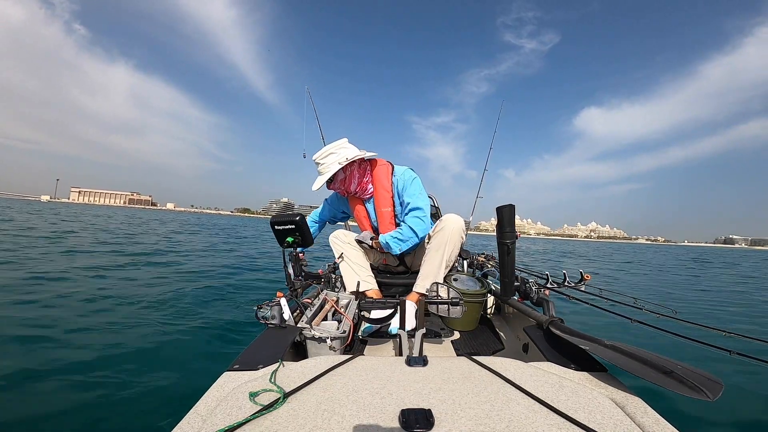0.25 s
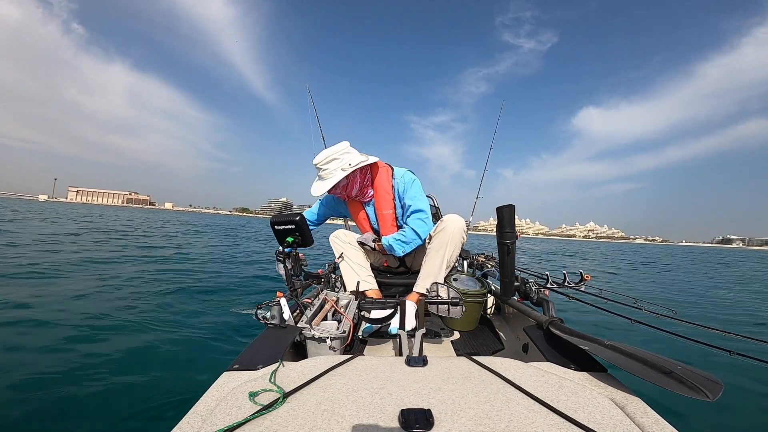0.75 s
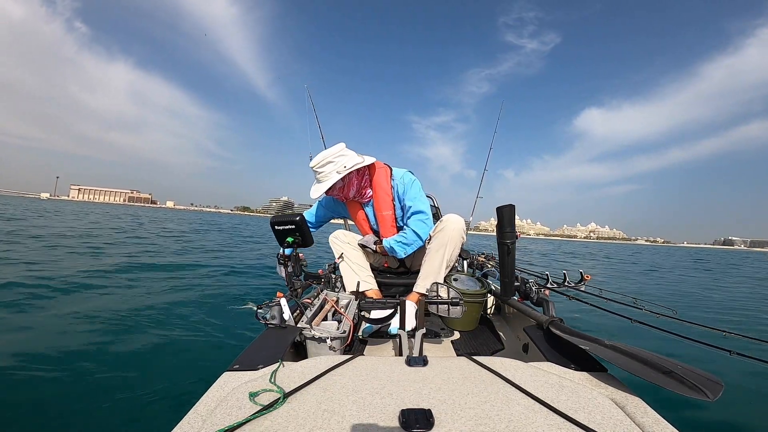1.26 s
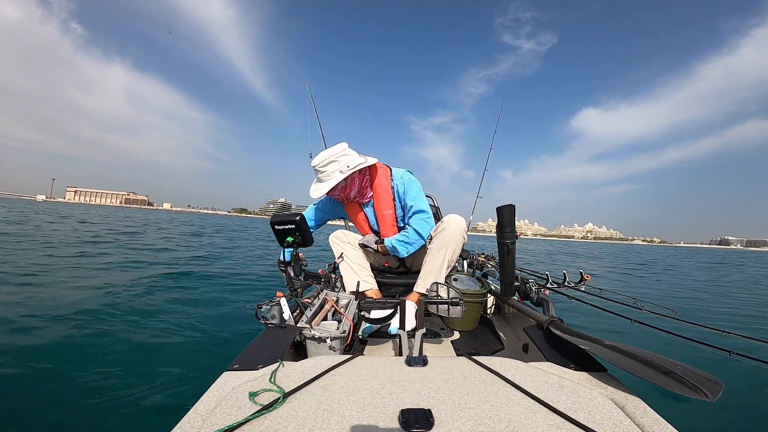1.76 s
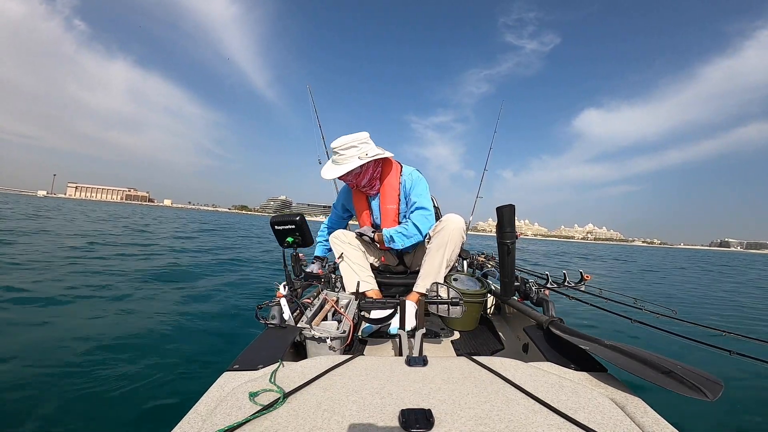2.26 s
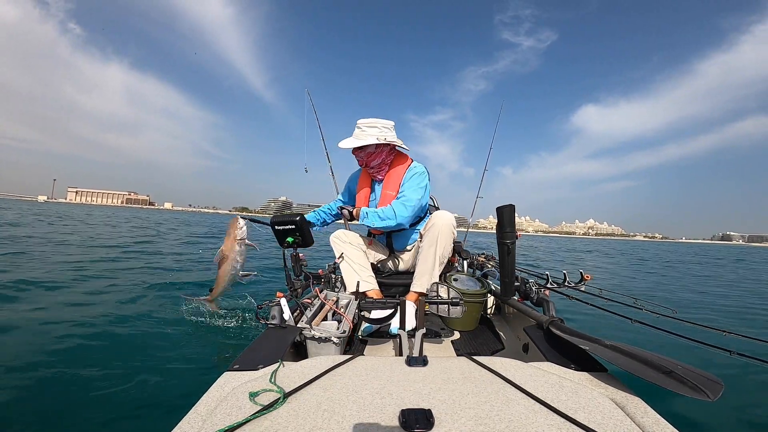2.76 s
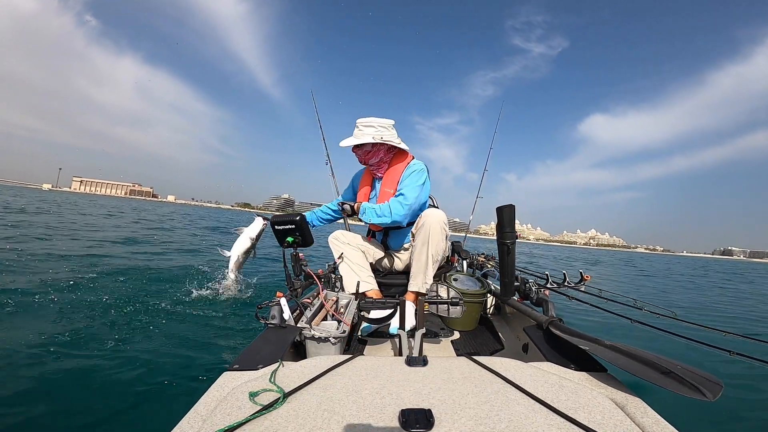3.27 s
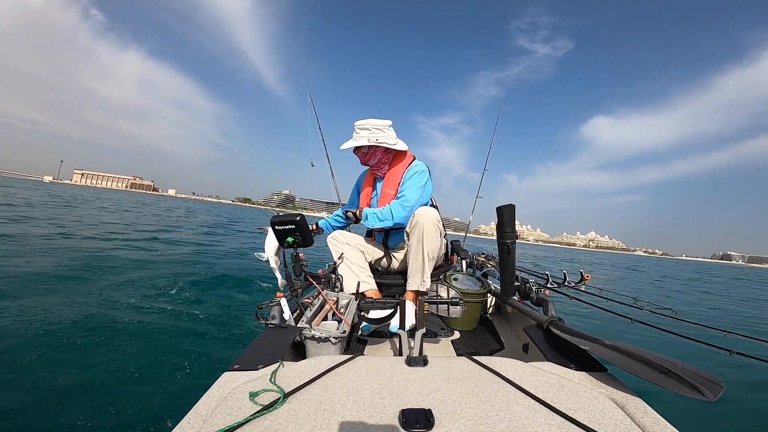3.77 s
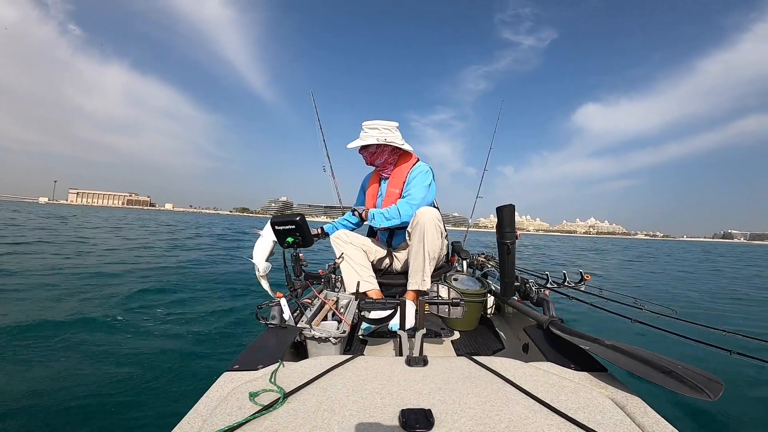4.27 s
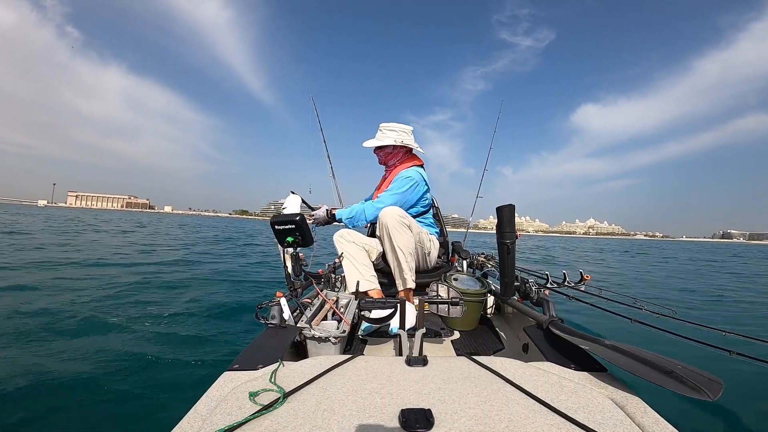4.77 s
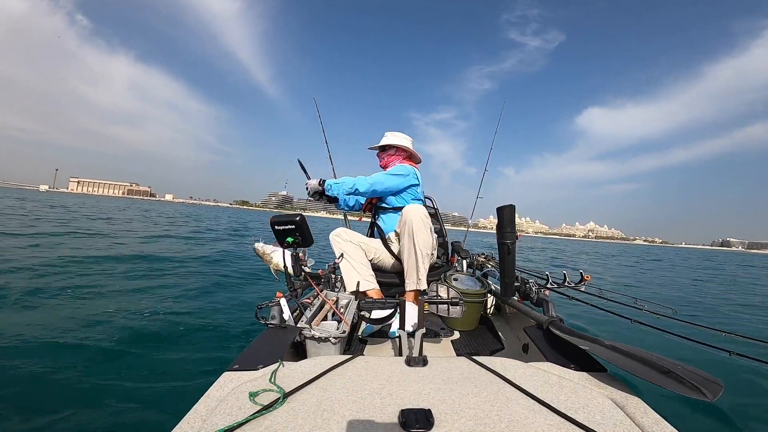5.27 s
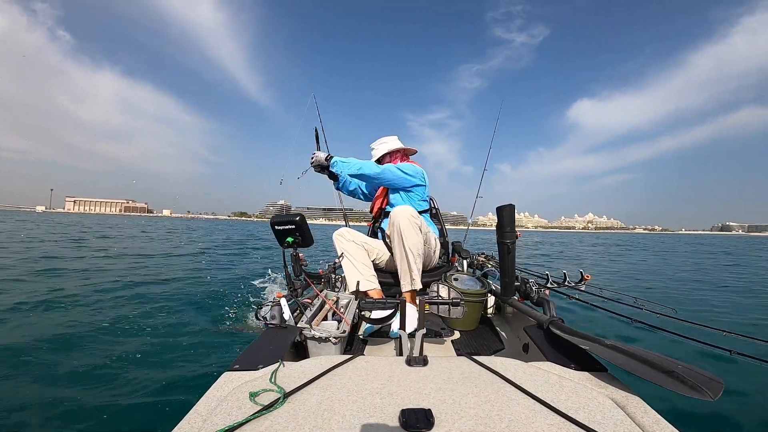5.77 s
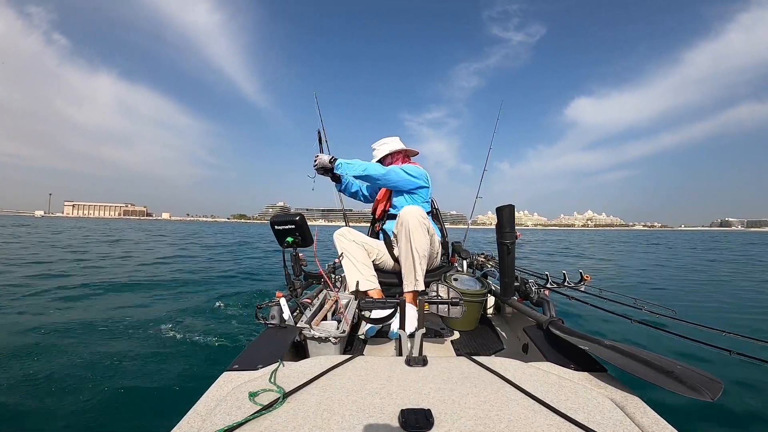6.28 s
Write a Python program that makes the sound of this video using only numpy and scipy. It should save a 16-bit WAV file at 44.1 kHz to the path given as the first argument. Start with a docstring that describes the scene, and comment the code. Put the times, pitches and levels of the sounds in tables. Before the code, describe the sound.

Wind rumbles on the microphone of a kayak on open water, with a low sea wash and a faint electronic buzz underneath. After a thumping gust on the right, a hooked fish thrashes at the surface with sharp splashes and bubbling. It drips as it is lifted out, and tackle clicks lightly. Then the fish drops back with a slap and a gulping splash that trails off in bubbles and drops.

```python
"""Fish beside a kayak

A hooked fish thrashes, is lifted out dripping, and drops back into the sea with a slap and a gulp.
The water is ringing, rising bubbles and sharp cracks of noise; tackle clicks now and then.
Wind rumbles on the microphone and buffets its right side. Underneath lie a low sea wash and a faint
electronic buzz, like a fish finder's: fast ticks ringing a few resonances."""
import sys
import numpy as np
from scipy import signal
from scipy.fft import rfft, irfft, next_fast_len
from scipy.io import wavfile
from scipy.ndimage import uniform_filter1d

SR = 44100
rng = np.random.default_rng(int(sys.argv[2]) if len(sys.argv) > 2 else 0)


def unload_wav(signal):
    """Save mono or channel-first audio to the path in sys.argv[1] as 16-bit WAV at rate SR, clipped to [-1, 1]."""
    wavfile.write(
        sys.argv[1],
        SR,
        np.round(np.clip(np.atleast_2d(signal).T, -1, 1) * 32767).astype(np.int16),
    )


N = 287867
TIME = np.arange(N) / SR

# a surge for each thrash, shower or plunge: start_s, level_db, hold_s, t60_s, brightness_db
SURGES = [(2.374, -53.5, 0.01, 0.5, -3.5), (2.448, -50.5, 0.27, 0.82, 1), (2.777, -49, 0.055, 0.079, -1),
          (2.852, -45.5, 0.04, 0.18, 12.5), (2.957, -54.5, 0.15, 0.14, 12), (3.075, -36, 0.02, 0.42, 10),
          (3.225, -48, 0.043, 0.18, 11), (3.286, -41.5, 0.046, 1.8, 7.5), (3.519, -47, 0.029, 1.37, 2.5),
          (5.368, -59, 0.14, 0.26, -0.5), (5.506, -47, 0.41, .3, 1.5), (5.647, -40, 0.14, 0.15, 3.5),
          (5.7505, -34, 0.014, 0.08, 1), (5.807, -41.5, 0.4, 2.02, 2.3), (6.129, -46, 0.033, 0.16, 14)]
# tone of stirred water: freq_hz, level_db
WATER_SPECTRUM = [(150, -34), (250, 4), (436, -3), (484, -7.5), (566, -3.5), (674, -3.5), (845, -6),
                  (1080, -5), (1260, -6.5), (1380, -9.5), (2570, -8), (3710, -14.5), (9490, -26.5),
                  (13000, -42), (16000, -42)]
# hollow churning round the fish, and wavelets lapping the hull: start_s, level_db, length_s
CHURNS = [(2.472, -38, 0.073), (2.556, -47, 0.26), (2.769, -42, 0.22), (4.268, -52, 0.19),
          (5.367, -42, 0.15), (5.622, -34, 0.23), (5.863, -50, 0.17)]
# the biggest bubbles and gulps: start_s, level_db, pitch_hz, t60_s, rise_fraction
PLOPS = [(0.123, -42, 520, 0.12, 0.13), (0.6075, -48, 1900, 0.022, 0.87), (1.232, -42.5, 2320, 0.035, .05),
         (2.36, -41, 2250, 0.049, 0.018), (2.386, -34, 933, 0.076, 0.27), (2.478, -36, 910, .04, .1),
         (2.505, -31.5, 2300, 0.015, .02), (2.509, -36.5, 612, 0.18, 0.046), (2.51, -16, 154, 0.15, 0.18),
         (2.563, -18, 162, 0.069, 0.26), (2.581, -36, 1100, 0.047, 0.18), (2.616, -26.5, 273, 0.1, 0.2),
         (2.625, -37, 644, 0.073, 0.22), (2.659, -38, 1900, .02, 0.66), (2.662, -34, 1020, .026, .1),
         (2.699, -32.5, 275, .099, 0.23), (2.71, -35.5, 1860, 0.022, .1), (2.803, -36, 1980, 0.021, 0.22),
         (2.825, -23.5, 303, 0.027, 0.37), (2.8667, -21.5, 4440, 0.0062, 0.066),
         (2.9125, -34.5, 2460, 0.016, 0.23), (3.0198, -22, 2390, 0.0079, .05),
         (3.033, -17.5, 1250, 0.049, 0.066), (3.122, -15.5, 1950, 0.016, .1), (3.14, -27, 2300, 0.0088, .1),
         (3.151, -35, 2900, .014, .35), (3.209, -37, 1670, 0.038, .1), (3.256, -31, 1870, 0.028, 0.06),
         (3.264, -32.5, 1400, 0.068, 0.33), (3.2811, -17, 1950, 0.0096, 1), (3.295, -30, 1256, 0.048, .1),
         (3.349, -34, 2080, .02, .1), (3.468, -29, 1180, 0.012, .1), (3.487, -30, 2980, 0.016, 0.23),
         (3.537, -31, 1910, 0.059, 0.09), (3.553, -28.5, 1020, 0.023, 0.17),
         (3.557, -24, 2250, 0.011, 0.38), (3.61, -24.5, 2300, 0.013, .2), (3.623, -37, 3420, .018, 0.092),
         (3.657, -33, 2600, .014, .1), (3.683, -31, 2610, 0.015, 0.49), (3.832, -35.5, 1190, 0.031, 0.1),
         (3.964, -38, 3070, 0.015, 0.27), (4.147, -43, 3330, 0.0098, .2), (4.332, -41.5, 726, 0.087, 0.23),
         (5.237, -35.5, 697, 0.083, 0.14), (5.436, -19, 567, 0.018, 0.22), (5.63, -28, 2630, 0.03, .5),
         (5.6619, -18, 362, 0.04, 0.3), (5.674, -23, 3450, 0.019, 0.18), (5.679, -16, 278, 0.12, 0.19),
         (5.693, -24, 1480, 0.022, .05), (5.71, -18, 292, 0.029, .2), (5.72, -20.5, 430, 0.033, 0.3),
         (5.741, -14.5, 2010, 0.016, 0.18), (5.7404, -18.5, 1090, 0.034, .05),
         (5.756, -21.5, 1470, 0.023, .1), (5.744, -11.5, 211, 0.065, 0.4), (5.76, -21, 2830, 0.025, 0.12),
         (5.779, -28, 2540, 0.033, 0.091), (5.838, -33, 2300, .02, .15), (5.857, -30, 776, 0.072, 0.3),
         (5.866, -45, 1570, .02, .1), (5.887, -36, 1810, .02, .1), (5.934, -35.5, 2200, .03, .5),
         (5.937, -39, 620, .05, 0.18), (5.963, -32, 598, 0.045, .15), (5.913, -25.5, 693, 0.043, 0.18),
         (5.992, -28, 970, 0.045, 0.16), (6.008, -27.5, 612, 0.12, 0.36), (6.02, -28, 790, 0.051, 0.19),
         (6.024, -30, 2640, 0.027, .15), (6.064, -29, 2090, .028, 0.27), (6.097, -31, 650, 0.045, .15),
         (6.135, -35, 2220, .016, .1), (6.136, -30, 595, 0.039, .2), (6.169, -23.5, 1750, 0.019, .1),
         (6.182, -22.5, 2580, 0.013, .15), (6.192, -35, 1000, 0.055, 0.18), (6.208, -33, 970, 0.028, .1),
         (6.217, -32, 2500, 0.016, .1), (6.234, -27.5, 2290, .03, .1), (6.274, -37, 1640, 0.042, 0.26),
         (6.312, -32.5, 2590, .022, .1), (6.315, -32, 547, 0.1, 0.15), (6.348, -36, 2140, .02, .2),
         (6.389, -43, 1620, 0.019, .2), (6.406, -31, 1250, 0.032, 0.044), (6.442, -33, 1385, 0.031, 0.12)]
# water struck by tail, body or heavy drops: start_s, level_db, pitch_hz, t60_s
SLAPS = [(2.379, -29, 1290, .04), (2.502, -26.5, 3380, 0.021), (2.5976, -21.5, 3700, 0.024),
         (2.636, -26, 4230, .012), (2.8477, -19.5, 4500, 0.032), (2.858, -11, 1860, 0.014),
         (2.868, -16.5, 2200, 0.015), (2.8754, -13.5, 4100, 0.008), (2.885, -20, 5200, .012),
         (2.892, -23, 2650, 0.028), (3.004, -23, 2530, 0.0093), (3.0086, -21, 2000, 0.021),
         (3.019, -27, 5750, .008), (3.0328, -24, 4700, 0.0098), (3.076, -26, 6500, .016),
         (3.084, -32, 2900, .045), (3.098, -14.5, 2490, .016), (3.1048, -13, 2470, 0.05),
         (3.1224, -12.5, 2450, 0.025), (3.203, -21, 2900, 0.016), (3.2803, -28.5, 2300, 0.022),
         (3.297, -25, 6500, .03), (3.317, -18, 3200, 0.031), (3.324, -19.5, 6300, 0.033),
         (3.3817, -19, 2680, 0.026), (3.412, -27, 3700, .016), (3.435, -24, 2680, 0.012),
         (3.4864, -25, 3180, 0.026), (3.551, -17.5, 2900, 0.034), (3.634, -24, 3520, 0.017),
         (3.656, -33, 3600, .012), (3.689, -24.5, 3750, 0.036), (3.7273, -23, 3820, .02),
         (4.075, -32, 3900, 0.016), (5.435, -28, 970, 0.03), (5.656, -16, 2700, 0.012),
         (5.6596, -24, 3700, 0.014), (5.673, -24, 3880, .02), (5.7406, -8, 1500, 0.039),
         (5.743, -19, 4200, 0.016), (5.756, -16, 1290, 0.04), (5.758, -16.5, 2900, 0.09),
         (5.889, -20, 3500, .016), (6.015, -20, 3300, 0.01), (6.151, -18, 4640, 0.015),
         (6.169, -20, 4500, 0.0087), (6.242, -13, 2930, 0.012), (6.42, -20.5, 3350, 0.011),
         (6.4342, -25, 5550, 0.011)]
# the falling fish's body shoving the water: pitch_hz, level_db, t60_s
SHOVE_MODES = [(343, -15.5, 0.019), (685, -4, 0.0041), (1530, -16, 0.0055)]
# drips off the fish and the rod: start_s, level_db, pitch_hz
DRIPS = [(3.772, -37, 3020), (3.813, -38, 6400), (3.863, -37.5, 5370), (3.885, -42, 6300),
         (3.9615, -41, 5800), (4.012, -41, 9000), (4.038, -38.5, 4540), (4.0755, -46, 7800),
         (4.103, -41, 8100), (6.377, -36, 5230), (6.485, -50, 2705)]
# clicks of tackle and pliers: start_s, level_db, pitch_hz, t60_s
CLICKS = [(0.011, -34, 3270, 0.062), (0.1164, -28, 3170, 0.0076), (0.297, -46, 2400, .015),
          (0.472, -58, 5200, .012), (0.718, -51, 5530, .012), (1.172, -53, 6500, 0.01),
          (1.9223, -46, 1430, 0.017), (2.2852, -41.5, 2040, 0.042), (4.408, -30.5, 3180, 0.025),
          (4.477, -33, 2550, 0.023), (4.558, -40.5, 1560, 0.014), (4.77, -40.5, 2240, 0.02),
          (5.2338, -30.5, 1700, 0.042), (5.2373, -36.5, 2450, 0.024), (5.4715, -39, 4500, 0.077)]
# small metal parts ringing with every click: pitch_hz, relative_db, t60_s
METAL_MODES = [(3230, -21, 0.031), (4400, -21, 0.031), (4900, -19, 0.0083)]
# sleeves and line brushing: start_s, level_db, length_s, low_hz, high_hz
BRUSHES = [(0.2, -78, 0.16, 900, 7000), (.85, -82, 0.13, 3000, 10000), (1.028, -79, 0.12, 3000, 10000),
           (1.556, -73.5, 0.074, 620, 6000), (1.82, -79, 0.16, 3000, 9900), (4.378, -53, 0.13, 620, 3970),
           (5.212, -53, 0.041, 620, 4000), (5.279, -46, 0.11, 1390, 7700)]
# strength and side of the wind: time_s, level_db, left_over_right_db
WIND_CURVE = [(0, -30, 2.5), (.22, -30.5, -2), (.36, -32.5, 2.5), (.65, -30, 0), (1.0, -31.5, 0),
              (1.34, -30, 2.5), (1.6, -29.5, -3), (1.8, -29, -2.5), (2.151, -26.5, -8), (2.35, -32, -3.5),
              (2.57, -26, -14), (2.74, -36, -9), (2.96, -34.5, -9), (3.12, -30, -6), (4.1, -30.5, -10),
              (5.7, -28, -3.5), (6.53, -30.5, 0)]
# tone of the wind rumble: freq_hz, level_db
WIND_SPECTRUM = [(11, -18), (18, -1.5), (65, 2.5), (107, -8.5), (130, -10), (210, -15), (268, -22),
                 (301, -23), (366, -31), (424, -32), (608, -40.5), (716, -38), (900, -59), (1170, -42.5),
                 (1980, -120)]
# how alike the rumble is left and right: freq_hz, correlation
WIND_CORRELATION = [(20, 0.1), (60, 0.69), (150, 0.91), (300, 0.89), (900, 1)]
# buffets of wind on the right: start_s, level_db, length_s, high_hz
BUFFETS = [(.2, -31, 0.079, 228), (1.742, -24, 0.044, 251), (1.813, -24, 0.05, 272),
           (1.911, -22, 0.03, 208), (2.048, -20.5, 0.047, 620), (2.076, -18.5, 0.091, 154),
           (2.124, -24, 0.067, 500), (2.196, -21.5, 0.045, 294)]
# tone of a buffet, weaker for small eddies: freq_hz, level_db
EDDY_SPECTRUM = [(30, -15), (80, 6), (160, -2.5), (290, -5.5), (400, -12), (800, -23)]
# dull thumps in the gust: start_s, level_db, start_pitch_hz, t60_s
THUMPS = [(1.9662, -1.5, 242, 0.04), (2.007, -8, 200, 0.031), (2.0635, -11, 343, 0.082),
          (2.138, -14, 450, 0.028), (2.169, -3.5, 128.6, 0.079)]
# resonances rung by each tick of the buzz: pitch_hz, level_db, t60_s
BUZZ_MODES = [(550.2, -59.5, 0.21), (719, -51.5, 0.063), (995, -64, 0.1), (1170, -43, 0.0046),
              (1152, -52, 0.018), (1498, -62, 0.053), (2034, -48.5, 0.0088), (2770, -52, 0.0046),
              (3366, -60, 0.016)]
# reflections of each tick along the hull: delay_s, level_db
HULL_ECHOES = [(.0034, -12), (0.0095, -7), (0.0146, -10), (.0182, -12.5)]
# thin whine high above the buzz: harmonic_number, level_db
WHINE_HARMONICS = [(102, -81.5), (104, -73), (105, -71), (108, -81)]
# tone of the sea wash: freq_hz, level_db
WASH_SPECTRUM = [(200, 1.5), (450, 5.5), (800, 0.5), (1300, -3.5), (1800, -9), (2300, -7), (3500, -19.5),
                 (4700, -20), (6000, -34.5), (10000, -49.5), (16000, -57.5)]
# hiss of handling and far ripples: time_s, level_db
HISS_CURVE = [(0, -73.5), (.45, -83.5), (1.21, -80), (1.26, -88), (1.8, -85), (1.95, -83), (2.25, -81),
              (2.6, -68), (4.6, -75), (5.1, -73.5), (6.53, -71)]
# stereo width: time_s, width_fraction
WIDTH_CURVE = [(0, 0.45), (1.15, .62), (1.7, 0.78), (2.3, 0.93), (2.62, 0.12), (2.73, 0.0011),
               (5.85, 0.002), (6.53, 0.41)]
# bass cut that comes in as the image narrows: freq_hz, gain_db
MONO_BASS_EQ = [(20, -3), (35, -9.5), (60, -6.5), (110, 0)]
# tone of the top end, a dip near 12 kHz, a lift near 13.5 kHz, then a roll-off: freq_hz, gain_db
TREBLE_EQ = [(20, 1.5), (9000, -1.5), (10500, 1.5), (11800, -4.5), (13500, 6), (16000, -6)]

GURGLE_DB, FIZZ_DB, SPRAY_DB = 1.5, 0, -15  # relative to the surge
BUZZ_HZ, BUZZ_START_S = 43.428, .0076


def stirred_water():
    """The thrashing and the plunge stir up three layers of bubbles and foam: gurgle, fizz and spray."""
    gurgle = swarm(396.5, 1784, per_s=520, cycles=38, spread_db=2.5, glide=0.756)
    fizz = swarm(1377, 4600, per_s=1500, cycles=18.3, spread_db=4.5, glide=0.48)
    spray = swarm(4770, 16400, per_s=900, cycles=25, spread_db=11.5, glide=0.5)
    foam = colour(rng.standard_normal(N), WATER_SPECTRUM)
    flutter = clumps()
    gurgle = unit_rms(gurgle) + amp(-17) * unit_rms(band(foam, 340, 1230))
    fizz = flutter * (unit_rms(fizz) + amp(-5.5) * unit_rms(band(foam, 2260, 7000)))
    spray = flutter * (unit_rms(spray) + unit_rms(band(foam, 5050, 12400)))
    layers = [(GURGLE_DB, -1, gurgle), (FIZZ_DB, 0, fizz), (SPRAY_DB, 1, spray)]
    return sum(amp(db) * surge_envelope(tilt) * steadied(layer, 0.027) for db, tilt, layer in layers)


def surge_envelope(tilt, attack_s=0.0058, lag_s=0.0017):
    """Surges rise, hold and die; tilt runs from -1 (gurgle, a touch early) to 1 (spray, a touch late)."""
    power = np.zeros(N)
    for s, db, hold, t60, bright_db in SURGES:
        t = TIME - s - tilt * lag_s
        decay_db = 60 * np.maximum(t - hold, 0) / t60
        power += (np.clip(t / attack_s, 0, 1) * amp(db + tilt * bright_db - decay_db)) ** 2
    return np.sqrt(power)


def clumps(depth_db=2, clump_s=0.0079):
    """Thrown water lands in clumps: a quick random flutter in level."""
    knots = np.arange(0, N / SR + clump_s, clump_s)
    jitter = np.clip(rng.standard_normal(len(knots)), -2, 1.3)
    return unit_rms(amp(depth_db * np.interp(TIME, knots, jitter)))


def bubble(hz, t60, rise, start_cycles):
    """An air bubble swings up fast and dies away, its pitch rising as it nears the surface."""
    t = np.arange(int(t60 * SR) + 8) / SR
    swell = 1 - np.exp(-t * hz / start_cycles)
    return swell * amp(-60 * t / t60) * np.sin(2 * np.pi * hz * t * (1 + rise * t / (2 * t60)))


def swarm(lo_hz, hi_hz, per_s, cycles, spread_db, glide, count=48):
    """A cloud of bubbles on `count` pitches, born at random times with random strengths."""
    out = np.zeros(N)
    for hz in np.geomspace(lo_hz, hi_hz, count):
        length, rise = rng.random(2)
        grain = bubble(hz, cycles * (0.79 + 1.87 * length) / hz, glide * rise, start_cycles=0.23)
        grain *= np.sqrt(hz / np.sum(grain ** 2))
        births = np.random.default_rng(rng.integers(2 ** 31)).random((int(per_s * N / SR / count), 2))
        for when, strength in births:
            add(out, when * N / SR, grain * amp(-spread_db * np.log(strength + 0.015)))
    return colour(out, WATER_SPECTRUM)


def churning():
    """Big, hollow bubbles crowd together where the fish pushes air under or wavelets lap the hull."""
    level = np.zeros(N)
    for s, db, length in CHURNS:
        add(level, s, amp(db) * np.hanning(int(length * SR)))
    crowd = swarm(221, 752, per_s=260, cycles=10, spread_db=1.0, glide=0.55, count=20)
    return level * steadied(band(crowd, 270, 730), 0.044)


def plops(wobble_depth=0.61, wobble_cycles=6.4):
    """Big single bubbles glide upward, wobbling in level as they change shape."""
    out = np.zeros(N)
    for (s, db, hz, t60, rise), knots in zip(PLOPS, rng.uniform(-0.99, 1, (len(PLOPS), 40))):
        tone = bubble(hz, t60, rise, start_cycles=0.33)
        cycles = np.arange(len(tone)) / SR * hz
        wobble = np.interp(cycles / wobble_cycles, np.arange(len(knots)), knots)
        add(out, s, amp(db) * tone * (1 + wobble_depth * wobble))
    return out


def slaps(pocket_db=-4.5, pocket_cycles=10, mist_db=-35):
    """Each slap cracks, pops a pocket of air and throws a little mist."""
    out = np.zeros(N)
    for s, db, hz, t60 in SLAPS:
        add(out, s, amp(db - 9.5) * crack(0.33 * hz, 1.31 * hz, t60, attack_s=.0004))
        add(out, s, amp(db + pocket_db) * bubble(hz, pocket_cycles / hz, rise=0.086, start_cycles=0.55))
        add(out, s, amp(db + mist_db) * crack(4520, 10000, t60=0.018, attack_s=0.0016))
    return out


def belly_flop():
    """The dropped fish meets the surface with a snap, then its whole flank smacks and shoves the water."""
    out = np.zeros(N)
    add(out, 5.5248, amp(-16.0) * crack(680, 2700, t60=0.041))
    add(out, 5.5248, amp(-20.5) * crack(3000, 10500, t60=0.0034))
    add(out, 5.5318, amp(-2) * bubble(2510, t60=0.005, rise=0.084, start_cycles=0.61))  # trapped air
    add(out, 5.5325, amp(-13.0) * crack(980, 3320, t60=0.0094))  # flank
    add(out, 5.533, amp(-22.5) * crack(600, 4000, t60=0.079))  # thrown water
    for hz, db, t60 in SHOVE_MODES:
        add(out, 5.5331, amp(db) * ring(hz, t60))
    return out


def falling_drops(level_db=-22.5, airtime_s=0.22):
    """Thrown water patters back down as soft ticks, trailing each surge."""
    pole = np.exp(-1 / (airtime_s * SR))
    trail = np.sqrt(signal.lfilter([1 - pole], [1, -pole], surge_envelope(tilt=0.68) ** 2))
    ticks = swarm(3050, 12200, per_s=200, cycles=20, spread_db=-1, glide=0.29, count=24)
    return amp(level_db) * trail * unit_rms(ticks)


def drips(ring_db=-5, ring_cycles=35):
    """Each drip ticks on the surface and rings a tiny bubble."""
    out = np.zeros(N)
    for s, db, hz in DRIPS:
        add(out, s, amp(db - 12.5) * crack(2200, 9600, t60=0.0094, attack_s=.0003))
        add(out, s, amp(db + ring_db) * bubble(hz, ring_cycles / hz, rise=.08, start_cycles=1))
    return out


def tackle():
    """Small hard clicks with a brief metal ring, and soft brushes of sleeve and line."""
    out = np.zeros(N)
    for s, db, hz, t60 in CLICKS:
        add(out, s, amp(db - 2) * crack(.5 * hz, 1.17 * hz, t60))
        add(out, s, amp(db - 7) * crack(3220, 4760, t60=0.0023))
        add(out, s, amp(db - 17) * ring(hz, t60))
        for metal_hz, metal_db, metal_t60 in METAL_MODES:
            add(out, s, amp(db + metal_db) * ring(metal_hz, metal_t60))
    for s, db, length, lo_hz, hi_hz in BRUSHES:
        size = int(length * SR)
        brush = unit_rms(band(rng.standard_normal(size), lo_hz, hi_hz, order=3))
        add(out, s, amp(db) * brush * np.hanning(size))
    return out


def wind():
    """Rumble partly shared by the two microphone ports, and buffets that strike only the right one."""
    left, independent = rfft(rng.standard_normal((2, N)), next_fast_len(N, True))
    shared = np.clip(curve_at(WIND_CORRELATION, np.linspace(0, SR / 2, len(left))), 0, 1)
    right = shared * left + np.sqrt(1 - shared ** 2) * independent
    rumble = colour(irfft(np.array([left, right]))[:, :N], WIND_SPECTRUM)
    s, db, pan_db = np.transpose(WIND_CURVE)
    sides = np.array([[.5], [-.5]])
    out = steadied(rumble, 0.11) * amp(np.interp(TIME, s, db) + sides * np.interp(TIME, s, pan_db))
    for s, db, length, hi_hz in BUFFETS:
        size = int(length * SR)
        eddy = colour(rng.standard_normal(size + 4096), EDDY_SPECTRUM)
        buffet = band(eddy, 45, hi_hz, order=4)[-size:] * signal.windows.tukey(size, .6)
        add(out[1], s, amp(db) * unit_rms(buffet))
    return out


def wind_thumps(half_pitch_s=0.018):
    """Sudden pushes of air on the right port: a few swings that sag in pitch as they die."""
    out = np.zeros((2, N))
    for s, db, hz, t60 in THUMPS:
        t = np.arange(int(t60 * SR)) / SR
        cycles = hz * half_pitch_s * np.log(1 + t / half_pitch_s)
        swell = 1 - np.exp(-cycles / 0.65)
        add(out[1], s, amp(db - 60 * t / t60) * swell * np.sin(2 * np.pi * cycles))
    return out


def electronic_buzz(whine_noise_db=-80.5):
    """A steady train of tiny ticks rings a few resonances and echoes along the hull, under a thin whine."""
    ticks, out = np.zeros(N), np.zeros(N)
    tick_times = np.arange(BUZZ_START_S, (N - 1) / SR, 1 / BUZZ_HZ)
    ticks[np.round(tick_times * SR).astype(int)] = 1
    for hz, db, t60 in BUZZ_MODES:
        out += amp(db) * signal.oaconvolve(ticks, ring(hz, t60))[:N]
    dulled = band(out, 440, 2700)
    for delay, db in HULL_ECHOES:
        add(out, delay, amp(db) * dulled)
    out = band(out, 423, 3280, order=6)
    for harmonic, db in WHINE_HARMONICS:
        out += amp(db) * np.cos(2 * np.pi * harmonic * BUZZ_HZ * (TIME - BUZZ_START_S))
    out += amp(whine_noise_db) * unit_rms(band(rng.standard_normal(N), 4400, 4710, order=3))
    return np.array([amp(0.15) * np.roll(out, 3), amp(1.3) * out])  # it reaches the right port first


def sea_wash(wash_db=-57, side_db=-7):
    """A low bed of open water, topped by a thin hiss of handling and far ripples."""
    wash, hiss = rng.standard_normal((2, 2, N))
    wash = amp(wash_db) * unit_rms(colour(wash, WASH_SPECTRUM))
    hiss = amp(np.interp(TIME, *np.transpose(HISS_CURVE))) * unit_rms(band(hiss, 2400, 9660, order=3))
    mid, side = wash + hiss
    return mid + amp(side_db) * np.array([side, -side])


def crack(lo_hz, hi_hz, t60, attack_s=.000067):
    """A sharp burst of noise, peaking at one."""
    t = np.arange(int(2 * t60 * SR) + 256) / SR
    noise = steadied(band(rng.standard_normal(len(t)), lo_hz, hi_hz), 0.033)
    burst = noise * amp(-60 * t / t60) * (1 - np.exp(-t / attack_s))
    return burst / abs(burst).max()


def ring(hz, t60):
    """A dying sine."""
    t = np.arange(int(t60 * SR) + 8) / SR
    return amp(-60 * t / t60) * np.sin(2 * np.pi * hz * t)


def amp(db):
    """Decibels to gain."""
    return 10 ** (np.asarray(db) / 20)


def unit_rms(x):
    """Scales to an rms of one."""
    return x / np.sqrt(np.mean(x ** 2) + 1e-20)


def curve_at(points, hz):
    """Reads a curve on a log-frequency axis."""
    freqs, values = np.transpose(points)
    return np.interp(np.log(hz + 1), np.log(freqs + 1), values)


def colour(x, points):
    """Applies an EQ curve."""
    size = next_fast_len(x.shape[-1] + 2048)
    gain = amp(curve_at(points, np.fft.rfftfreq(size, 1 / SR)))
    return irfft(rfft(x, size) * gain, size)[..., :x.shape[-1]]


def band(x, lo_hz, hi_hz, order=2):
    """Causal band-pass."""
    sos = signal.butter(order, [lo_hz, min(hi_hz, SR / 2 - 500)], "band", fs=SR, output="sos")
    return signal.sosfilt(sos, x)


def steadied(x, seconds):
    """Levels out swells slower than the given time."""
    power = abs(uniform_filter1d(x ** 2, max(int(seconds * SR), 8)))
    return x / np.sqrt(power + 1e-4 * np.mean(x ** 2))


def add(mix, s, sound):
    """Mixes a sound in at s seconds."""
    part = mix[..., max(round(s * SR), 0):][..., :sound.shape[-1]]
    part += sound[..., :part.shape[-1]]


def scene():
    """Water and tackle sit in the centre; wind, buzz and sea wash are in stereo."""
    water = stirred_water() + churning() + plops() + slaps() + falling_drops() + drips() + belly_flop()
    return wind() + wind_thumps() + water + tackle() + electronic_buzz() + sea_wash()


def record(dry, cutoff_hz=15900):
    """The image folds to mono after the gusts and partly reopens at the end; treble EQ and low-pass."""
    width = np.clip(np.interp(TIME, *np.transpose(WIDTH_CURVE)), 0, 1)
    mid, side = dry.mean(0), (dry[0] - dry[1]) / 2 * width
    mid = width * mid + (1 - width) * colour(mid, MONO_BASS_EQ)
    heard = colour(np.array([mid + side, mid - side]), TREBLE_EQ)
    low_pass = signal.firwin(511, cutoff_hz, window=("kaiser", 9), fs=SR)
    return signal.oaconvolve(heard, low_pass[None], "same")


dry = scene()
out = record(dry)
unload_wav(out)
```